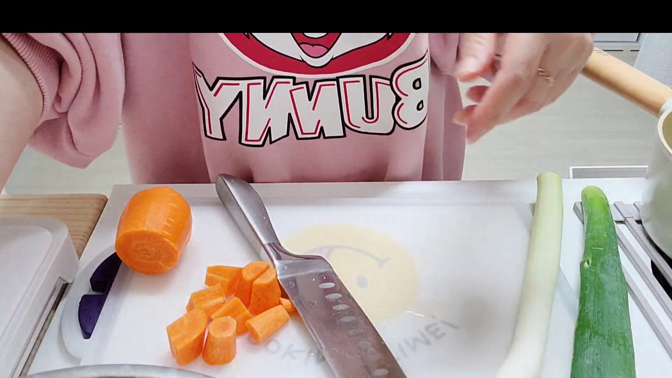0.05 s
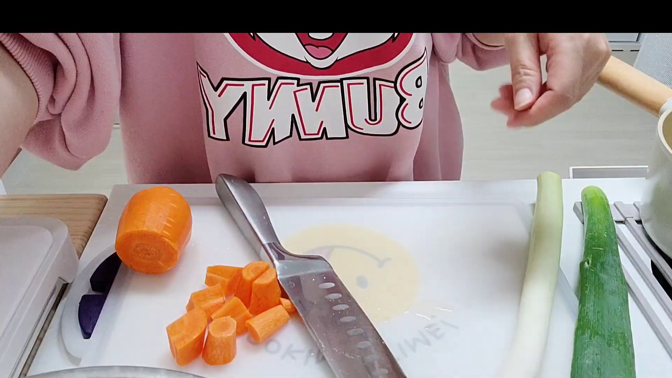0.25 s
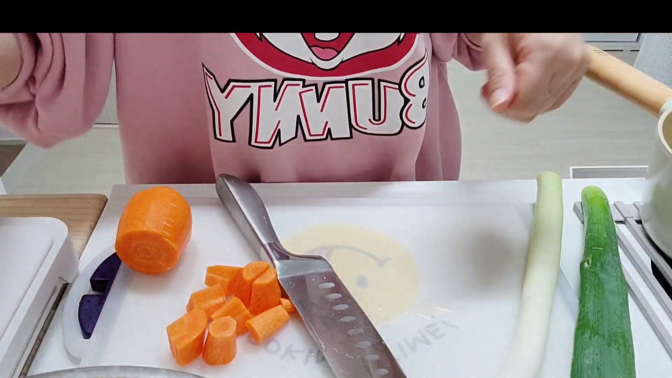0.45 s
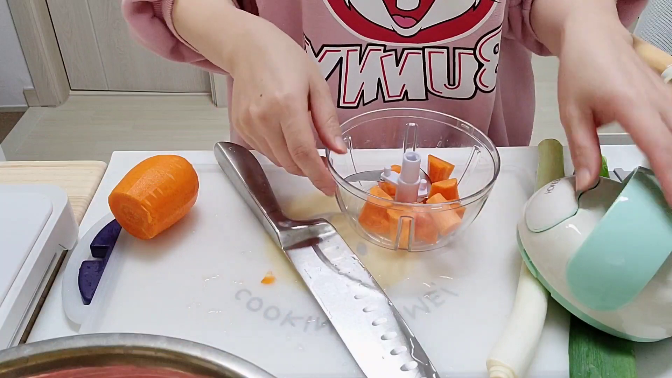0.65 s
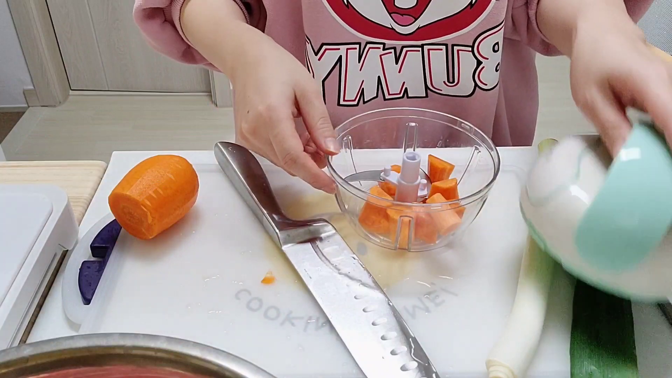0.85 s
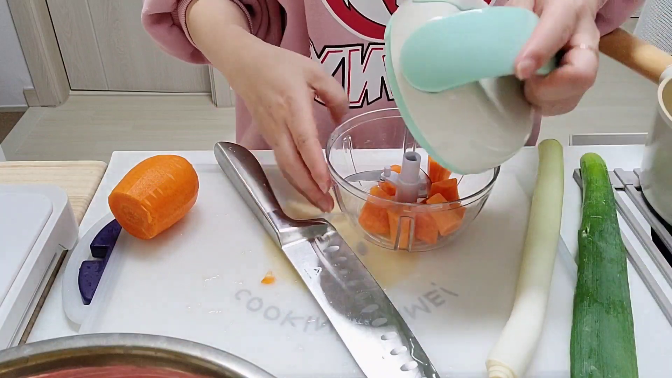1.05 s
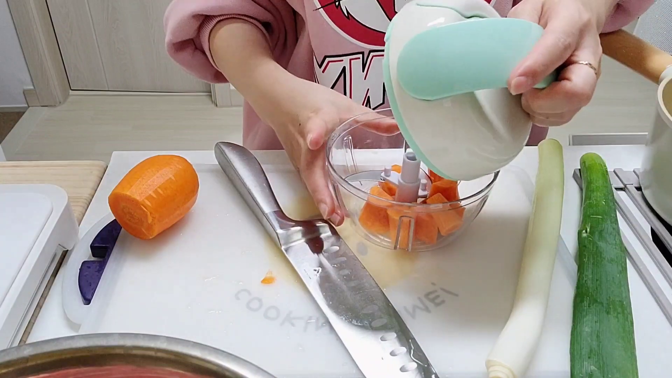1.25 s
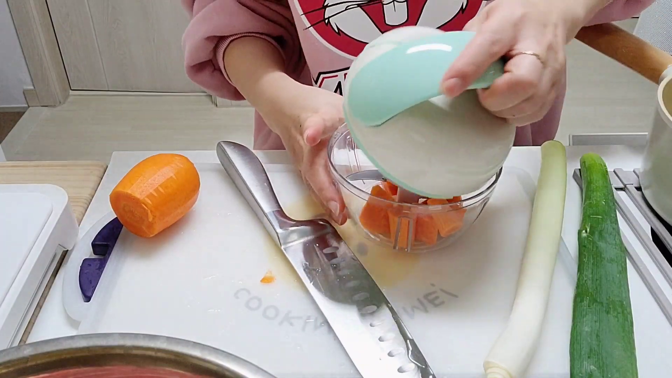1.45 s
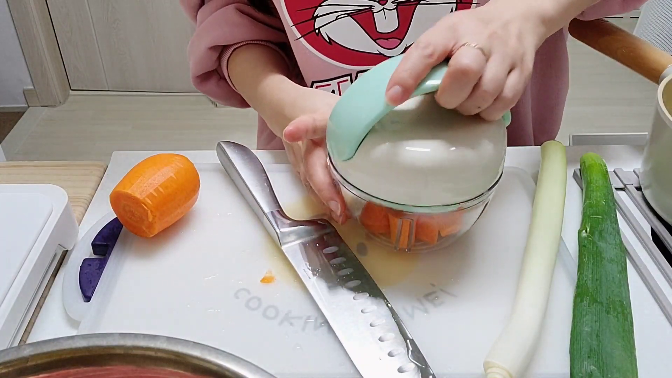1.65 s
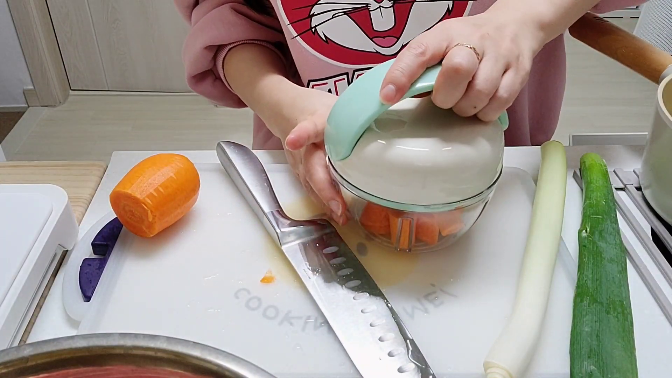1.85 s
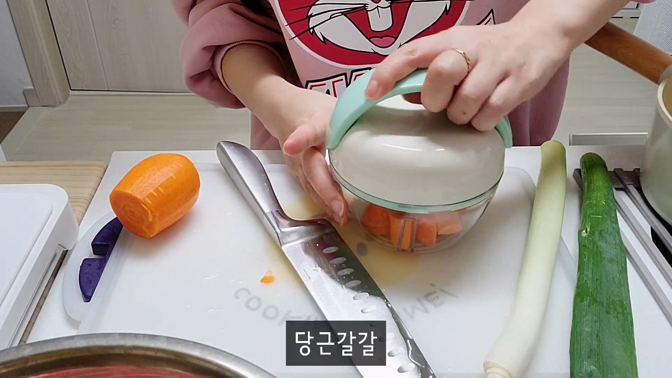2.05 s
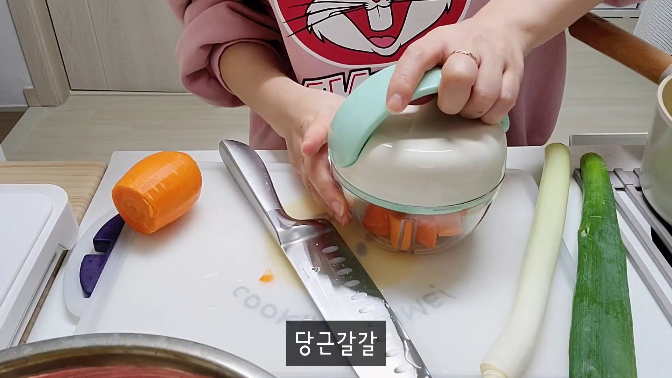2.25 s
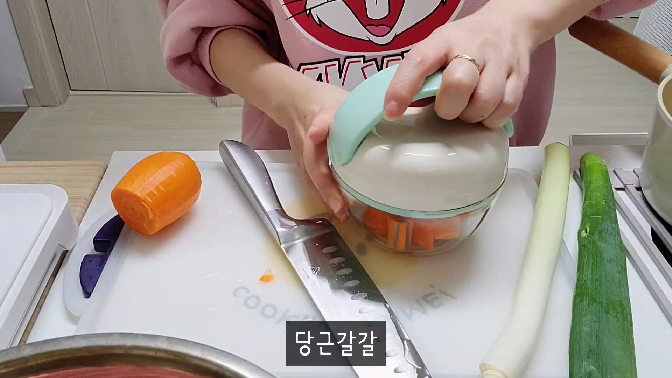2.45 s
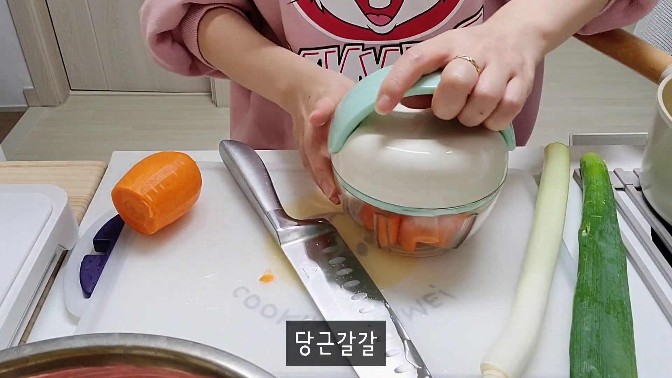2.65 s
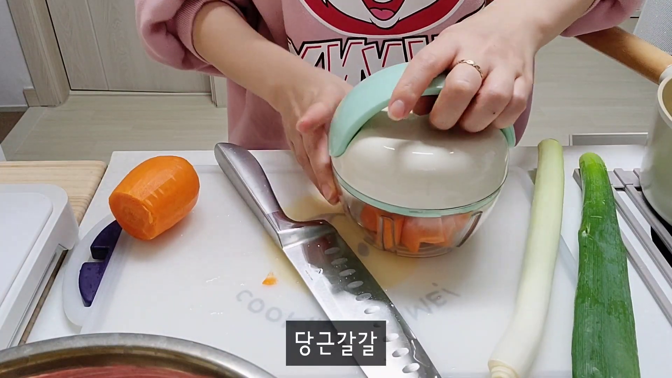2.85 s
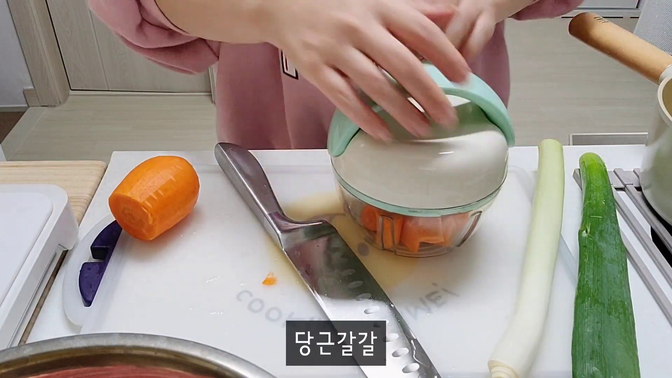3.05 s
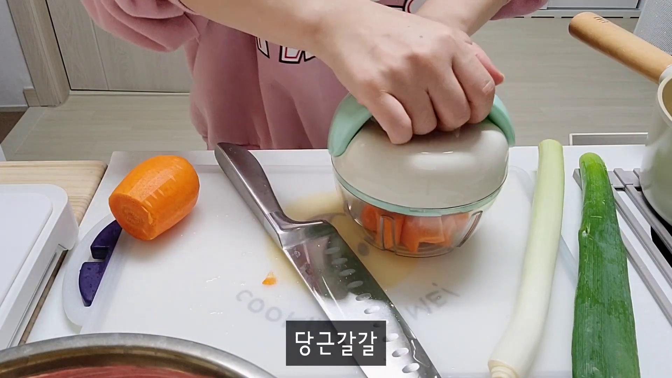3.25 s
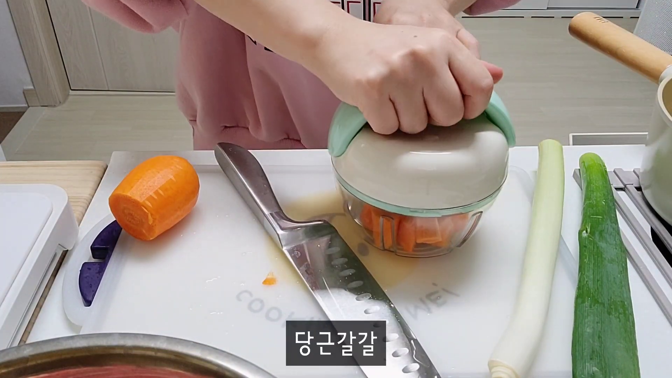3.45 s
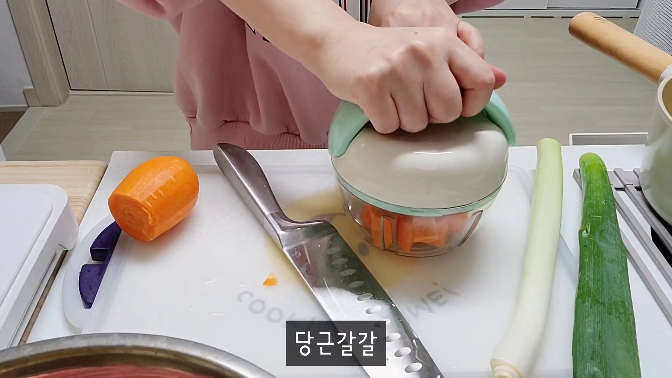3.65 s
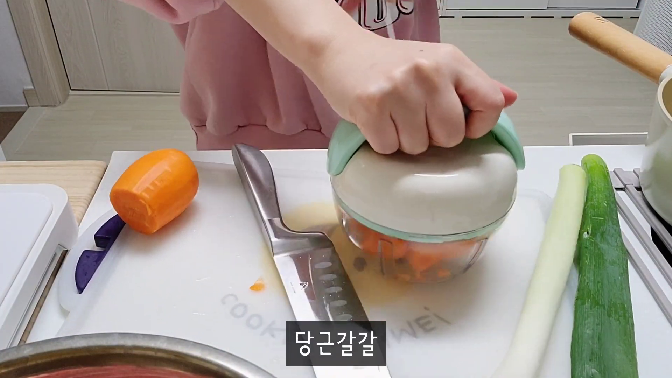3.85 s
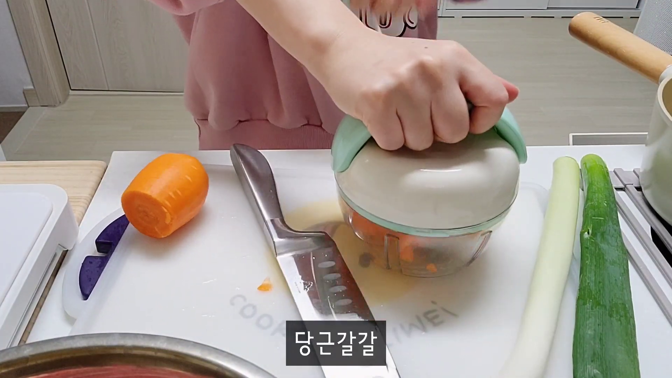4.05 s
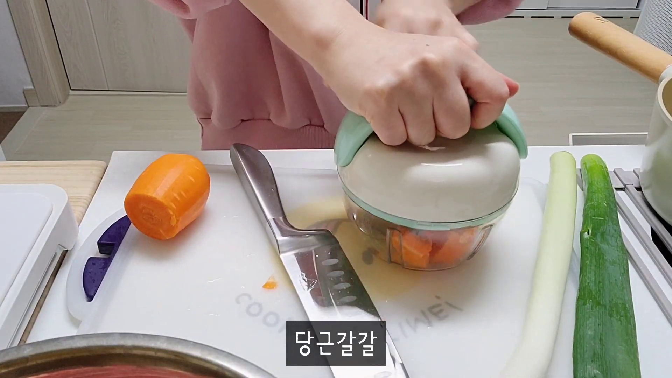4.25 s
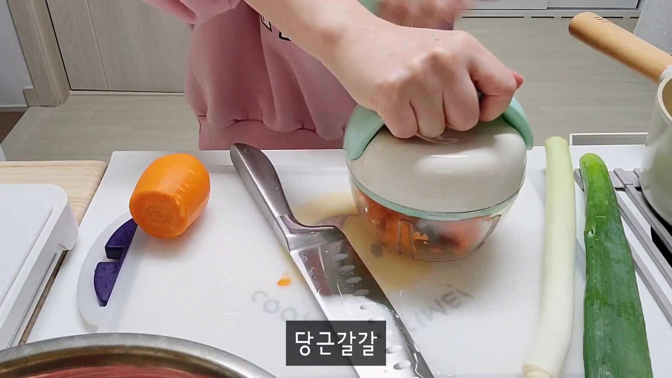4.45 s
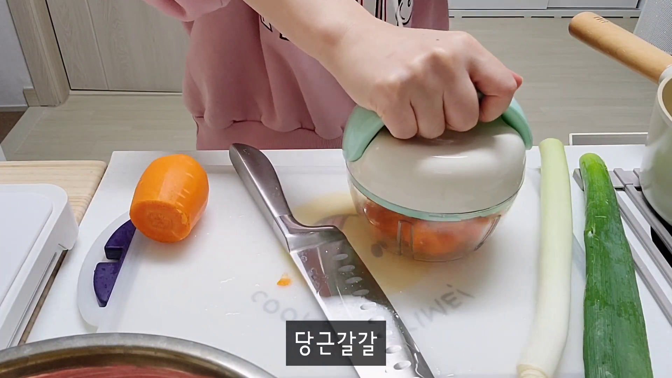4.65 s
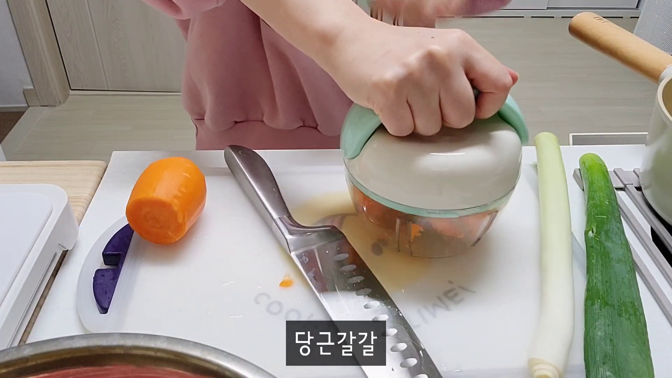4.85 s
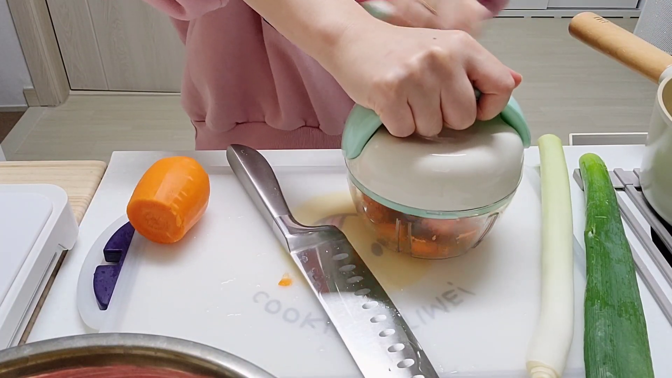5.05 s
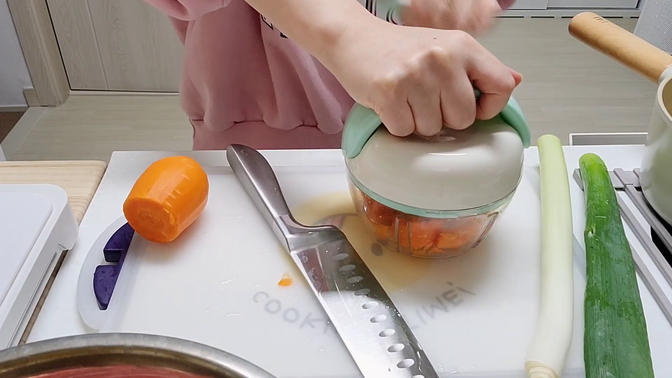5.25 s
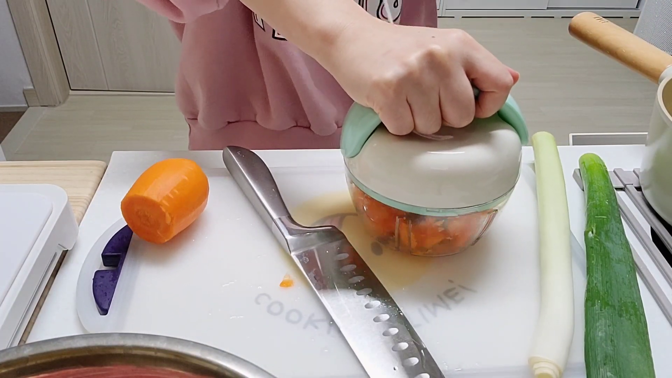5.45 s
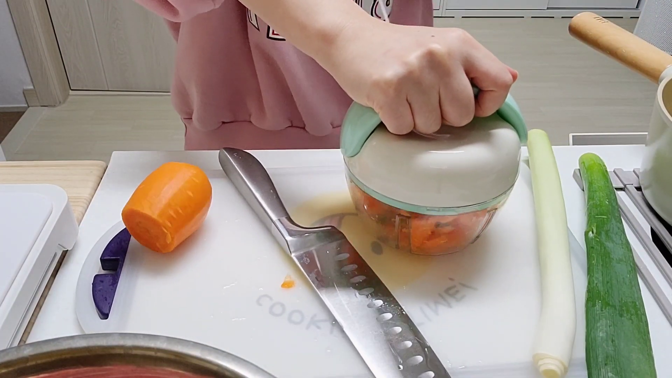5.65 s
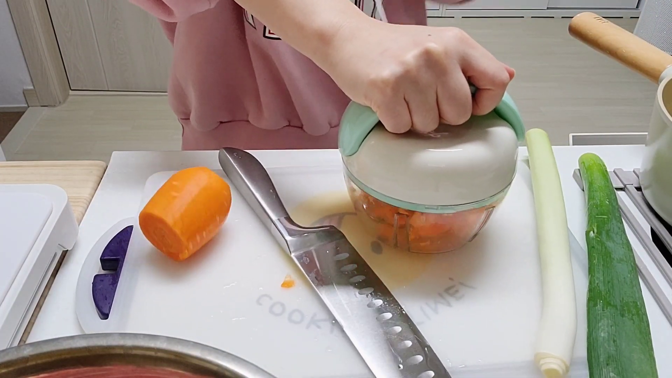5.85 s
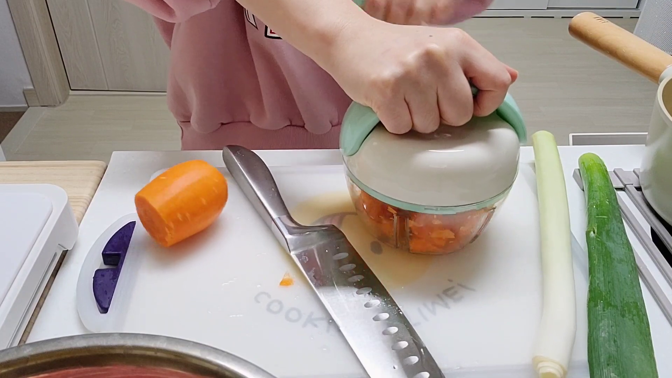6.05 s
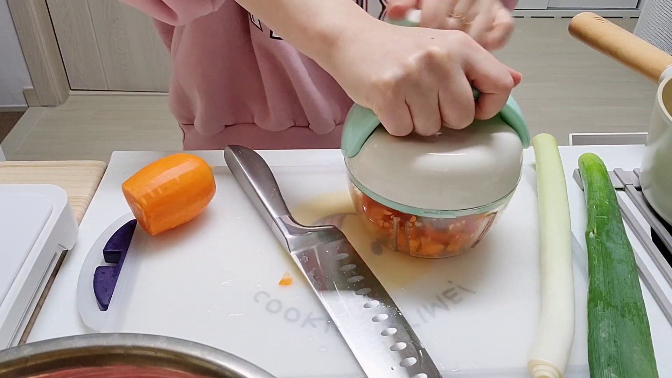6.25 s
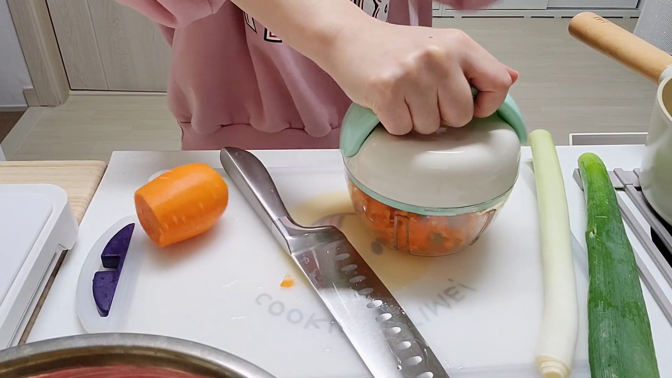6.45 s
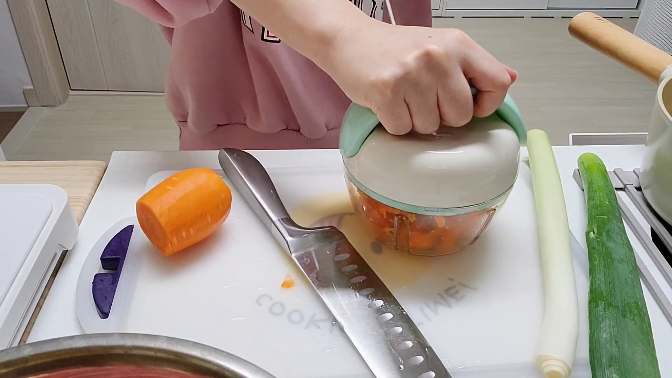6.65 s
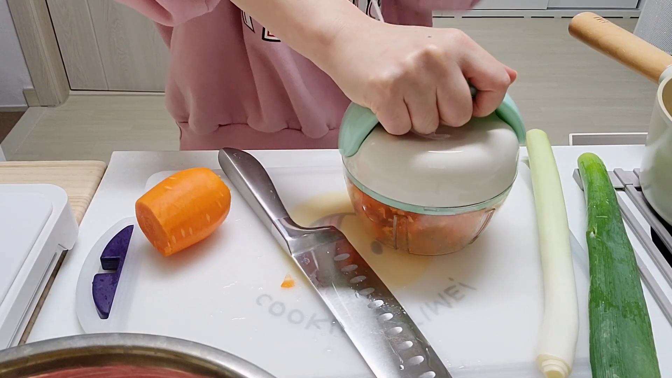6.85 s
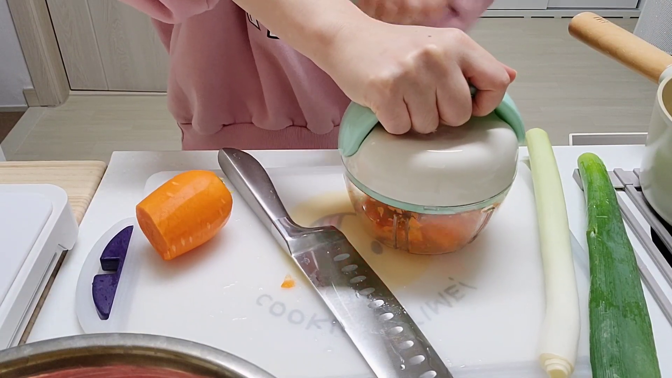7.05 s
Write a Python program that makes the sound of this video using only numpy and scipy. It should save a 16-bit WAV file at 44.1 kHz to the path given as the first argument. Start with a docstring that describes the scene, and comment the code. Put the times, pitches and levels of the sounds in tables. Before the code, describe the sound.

In a quiet kitchen, a plastic lid is set on a small chopper bowl with light knocks, hollow bumps and faint finger rubs. Then the cord is pulled again and again, about four times a second. Each pull whirls the blades through carrot chunks with a hard plastic clatter and crunch, and a lighter spring rattle winds the cord back between pulls. The sound is close, with a short room echo.

```python
"""A cord-pulled food chopper cuts carrots on a plastic board in a quiet kitchen.
First the lid is lifted, set on the bowl and gripped, with knocks, rubs and hollow notes of trapped air.
Then each pull of the cord whirls the blades through the chunks, and a spring rattles the cord back in.
The hits make the plastic bowl, lid and board ring. Behind it are a low drone, a faint hiss,
rustling sleeves and one far tinkle of metal."""
import sys
import numpy as np
from scipy import signal
from scipy.fft import rfft, irfft, next_fast_len
from scipy.io import wavfile
from scipy.ndimage import uniform_filter1d, map_coordinates

SR = 44100
rng = np.random.default_rng(int(sys.argv[2]) if len(sys.argv) > 2 else 0)


def unload_audio(sound):
    """Save the sound as a 16-bit wav file, at the path given as the first command line argument."""
    columns = np.transpose(np.atleast_2d(sound))
    # keep every value between -1 and 1, then stretch to whole-number steps
    steps = np.round(np.clip(columns, -1, 1) * 32767)
    wavfile.write(sys.argv[1], SR, steps.astype(np.int16))


N = 313110
TIME = np.arange(N) / SR

# How long the kitchen echoes. Each row: frequency in Hz, seconds to fade by 60 dB.
ECHO_TIMES = [(150, 0.29), (1500, 0.23), (10000, 0.15)]
# How much left and right differ. Each row: frequency in Hz, level of the difference in dB.
STEREO_WIDTH = [(60, -30), (180, -19.5), (550, -7.5), (1650, -4.5), (4970, -2), (15000, 1.5)]
# Background, in two stretches with a brief gap. Each row: time in seconds, drone in dB, hiss in dB.
AIR_LEVELS = [
    [(0.0, -63, -77), (0.418, -60, -72.5), (0.6, -64.5, -75.5)],
    [(0.63, -70, -83.5), (3.31, -68.5, -81), (3.76, -63.5, -75.5)],
]
# Sleeves, one list for each rustle. Each row: time in seconds, level in dB.
RUSTLES = [
    [(0.0, -55), (0.086, -60.5), (0.18, -89)],
    [(.84, -90), (1.03, -80.5), (1.13, -87)],
    [(2.98, -88), (3.15, -80.5), (3.2, -66)],
]
# Far metal scrapes, then rings. Each row: start in seconds, level in dB.
METAL_SCRAPES = [(0.352, -74), (0.402, -74)]
# Its ringing notes. Each row: start in seconds, pitch in Hz, level in dB, seconds to fade by 60 dB.
METAL_NOTES = [(.365, 2340, -65, 0.13), (.405, 5780, -68, .1), (.41, 5110, -74, 0.46)]
# The tone of four kinds of noise. Each row: frequency in Hz, level in dB.
DRONE_TONE = [(15, -58), (25, -0.5), (214, -4.5), (275, -12.5), (424, -16.5), (617, -21), (910, -21.5),
              (1540, -120)]
HISS_TONE = [(400, -40), (616, -10.5), (789, -29), (1090, -17.5), (1200, -21), (1310, -18), (2970, -27.5),
             (3210, -17), (3870, -26.5), (5270, -36), (16000, -42)]
RUSTLE_TONE = [(180, -46), (300, -17.5), (614, -5.5), (961, -17), (1320, -9), (3400, -17.5), (7820, -23.5),
               (16000, -45)]
CRACK_TONE = [(1470, -1), (2500, -5), (3010, -12), (3440, -16.5), (4080, -3.5), (6500, -16), (16000, -30.5)]
# The notes each part rings at. Each row: pitch in Hz, width in Hz (narrow rings longer), level in dB.
COUNTER_NOTES = [(69, 110, 3.5), (107.6, 9, 2.5), (148, 37, 0), (223, 12, -3.5)]
HANDLE_NOTES = [(1140, 400, 2), (1765, 100, 0), (2190, 250, -6), (2970, 100, -1)]
BOARD_NOTES = [(112, 42, -15), (215.4, 66, 2), (359, 32, 0.5)]
BOWL_NOTES = [(619, 57, 0.5), (926, 99, 4), (1094, 91, 1), (1404, 71, 4.5), (1597, 53, 1.5),
              (1872, 130, -5), (2245, 120, -8)]
LID_NOTES = [(2975, 110, -1.5), (3009, 170, 2.5), (3642, 96, -7), (4160, 91, -13.5), (4290, 300, -19.5),
             (4830, 78, -9.5), (5720, 119, -13)]
PAWL_NOTES = [(3120, 38, 5.5), (3450, 170, 0.5), (4000, 90, 1), (4880, 34, 2.5), (5080, 360, 1),
              (6000, 120, 2), (7720, 1240, 2), (11340, 460, -8.5)]  # the pawl is the small catch that rides over a toothed wheel
# Soft bumps of hands and bowl on the board. Each row: start in seconds, level in dB.
BUMPS = [(1.204, -39), (1.229, -37), (1.398, -48), (1.999, -46.5), (2.135, -35), (2.223, -37),
         (2.303, -42.5), (2.37, -43), (2.551, -47), (2.662, -35), (2.699, -44), (2.796, -47.5),
         (3.183, -48), (3.287, -41.5), (3.329, -52), (3.374, -33), (3.502, -37.5)]
# Air between lid and bowl, lower as the lid closes. Each row: start in seconds, level in dB, pitch in Hz.
HOLLOW_NOTES = [(1.235, -31, 385), (1.399, -44, 860), (1.648, -27, 845), (1.666, -36, 770),
                (1.682, -38, 734), (1.703, -40, 796), (1.72, -38, 870), (1.727, -40, 856),
                (1.746, -37, 755), (1.764, -18.5, 580), (1.851, -35, 510), (2.131, -26, 368),
                (2.139, -25, 357), (2.227, -35, 373)]
# Fingers rub lid and handle. Each row: start in seconds, length in seconds, level in dB.
RUBS = [(1.65, 0.16, -61.5), (2.265, 0.14, -58), (2.649, 0.14, -58.5), (3.266, 0.162, -61),
        (3.483, 0.18, -59.5)]
# Knocks of lid, bowl and hands. Each row: start in seconds, level in dB, brightness in dB.
KNOCKS = [(.639, -57.5, -19), (0.707, -72.5, 7.5), (0.864, -62, -18), (1.201, -40.5, 1), (1.215, -41, -8),
          (1.238, -35.5, -12), (1.397, -54, -3), (1.563, -62, -14), (1.648, -44, -17), (1.679, -56.5, -3),
          (1.72, -45, -17.5), (1.755, -64, 3), (1.764, -30, -12.5), (1.841, -42.5, -10.5), (1.85, -41, -16),
          (2.067, -54, -15), (2.129, -25, -6.5), (2.224, -39.5, -10), (2.294, -45.5, -6.5),
          (2.329, -42, -8.5), (2.468, -71.5, 8), (2.562, -52, -11.5), (2.686, -45.5, -38),
          (2.728, -45.5, -14.5), (3.178, -59.5, -2.5), (3.186, -49.5, -3), (3.298, -68, 8.5),
          (3.326, -54.5, 10), (3.354, -48, -11), (3.374, -39, 1), (3.475, -52.5, -11), (3.508, -42.5, -8.5),
          (3.704, -60, 5.5), (3.712, -49, -9)]
# The spring winds the cord back. Each row: start in seconds, length in seconds, level in dB.
REWINDS = [(3.942, 0.15, -53.5), (4.249, 0.11, -48), (4.511, 0.11, -47), (4.778, 0.12, -51),
           (5.031, 0.12, -48), (5.278, 0.12, -45), (5.529, 0.11, -44), (5.772, 0.11, -44.5),
           (6.036, 0.094, -46), (6.256, 0.13, -45), (6.511, 0.1, -44.5), (6.775, 0.11, -43.5),
           (7.027, 0.12, -45)]
# The pawl snaps over a tooth. Each row: start in seconds, level in dB.
PAWL_SNAPS = [(4.262, -46), (4.814, -51), (5.052, -46), (6.04, -36.5), (6.298, -38), (6.575, -39.5),
              (6.802, -48.5), (6.844, -48)]
# Pulls of the cord. Each row: start, spin-up time and length in seconds, whirl in dB, clutch click in dB.
PULLS = [(3.771, 0.017, 0.16, -28, -35.5), (4.089, 0.021, 0.15, -29.5, -41),
         (4.404, 0.0061, 0.15, -31, -58), (4.636, 0.04, 0.12, -27, -24), (4.896, 0.042, 0.16, -29, -25.5),
         (5.152, 0.017, 0.14, -30, -28.5), (5.392, 0.026, 0.16, -31, -33.5),
         (5.646, 0.035, 0.13, -30.5, -31), (5.879, 0.028, 0.12, -29.5, -31), (6.131, 0.04, 0.14, -30, -31),
         (6.374, 0.023, 0.14, -34, -23.5), (6.626, .008, 0.15, -33.5, -25.5), (6.883, 0.02, 0.14, -30, -24)]
# Hard blade strikes. Each row: start in seconds, level in dB, brightness in dB.
CHOPS = [(3.788, -13, -18), (3.803, -2, -24), (3.835, -11, -20), (3.869, -17, -32), (3.983, -20, -16),
         (4.106, -25, -32), (4.121, -14.5, -10), (4.142, -19, -22), (4.156, -26, -11), (4.175, -6.5, -21),
         (4.284, -19, -14), (4.366, -17, -11), (4.415, -22, -13), (4.422, -8.5, -12), (4.449, -6, -19),
         (4.657, -21, -4), (4.68, -10.5, -9.5), (4.71, -7, -8.5), (4.923, -7, -22.5), (4.942, -14, -12.5),
         (4.981, -18, -25), (4.984, -23, -3.5), (5.168, -20, 1), (5.195, -12, -20), (5.266, -30, -20),
         (5.426, -24, -8), (5.447, -9, -12.5), (5.483, -11, -44), (5.52, -13.5, -44), (5.675, -32, -19),
         (5.69, -22, -16), (5.714, -29, -10), (5.909, -22, 0.5), (5.92, -5, -16), (5.934, -12, -25),
         (6.182, -25.5, 1), (6.195, -7, -25.5), (6.225, -12, -26), (6.41, -24, -15), (6.438, -14.5, -15.5),
         (6.467, -13.5, -23), (6.663, -14.5, -21), (6.673, -12, -14), (6.684, -10.5, -10),
         (6.914, -30, -20), (6.928, -14.5, -8.5), (6.963, -11, -12.5), (7.009, -16, -28)]


def amp(db):
    """Turn decibels into a number to multiply by."""
    return 10 ** (np.asarray(db) / 20)


def unit(x):
    """Scale a signal to an average power of 1."""
    return x / np.sqrt(np.mean(x ** 2) + 1e-20)


def along(points, hz):
    """Read between the rows of a frequency table, on a log scale."""
    freqs, values = np.transpose(points)
    return np.interp(np.log(hz + 1), np.log(freqs + 1), values)


def curves(stretches):
    """Join timed rows into one curve per column; the first curve is silent between stretches."""
    silence = lambda row, step: (row[0] + step, -120, *row[2:])
    rows = [row for part in stretches for row in (silence(part[0], -.004), *part, silence(part[-1], .004))]
    times, *columns = np.transpose(sorted(rows))
    return [np.interp(TIME, times, column) for column in columns]


def strokes(start, rise, length, db, fall_s, sag_db, edge_db, crest_db):
    """Level in dB of sagging strokes; edge_db shifts their two ends and crest_db their middle."""
    shapes = [[(s, level + edge_db), (s + up, level),
               (s + (up + span - fall_s) / 2, level + sag_db / 2 + crest_db),
               (s + span - fall_s, level + sag_db), (s + span, level + sag_db + edge_db)]
              for s, up, span, level in np.broadcast(start, rise, length, db)]
    return curves(shapes)[0]


def bursts(times, levels_db, decay_s, rise_s):
    """Short pushes that rise fast and die away."""
    out = np.zeros(N + SR)
    t = np.arange(int(decay_s * 7 * SR)) / SR
    for start, db in np.broadcast(times, levels_db):
        out[round(start * SR):][:len(t)] += amp(db) * np.exp(-t / decay_s) * (1 - np.exp(-t / rise_s))
    return out[:N]


def taps(per_second, spread_db, bed_db):
    """Random taps of uneven size on top of a steady push."""
    hit = rng.random(N) < per_second / SR
    size = hit * amp(spread_db * np.minimum(rng.exponential(size=N), 2))
    return unit(unit(size) + amp(bed_db))


def wander(per_second):
    """A curve that slides from one random value to the next."""
    return np.interp(TIME * per_second, np.arange(600), rng.standard_normal(600))


def filtered(x, response):
    """Turn each frequency up or down by response(hz)."""
    size = next_fast_len(N + 8192)
    return irfft(rfft(x, size) * response(np.fft.rfftfreq(size, 1 / SR)), size)[..., :N]


def noise(tone, force=1):
    """Noise with the given tone, loud where the force is strong."""
    colour = lambda x: filtered(x, lambda hz: amp(along(tone, hz)))
    white = rng.standard_normal((2, N))
    return colour(force * white) / np.std(colour(white))


def ring(force, notes, wander_db=0, detune=0):
    """Each tap rings each note at a random strength; notes swell and fade as the contact point roams."""
    out, power = np.zeros((2, N)), 0
    for hz, width, db in notes:
        for shift in (-detune, detune):  # each note is a close pair
            decay = np.exp(-np.pi * max(width, 10) / SR)
            angle = 2 * np.pi * hz * (1 + shift) / SR
            share = rng.standard_normal(out.shape) * unit(amp(wander_db * wander(per_second=14)))
            note = signal.lfilter([np.sin(angle)], [1, -2 * decay * np.cos(angle), decay ** 2], force * share)
            out += amp(db) * np.sqrt(width) * note
            power += amp(db) ** 2 * width / (1 - decay ** 2) / 2
    return out / np.sqrt(power)


def widen(pair, lag_share=0.35):
    """Make left and right from a middle and a side signal; they differ most in the treble."""
    middle, side = pair
    gain = lambda hz: amp(along(STEREO_WIDTH, hz))
    shifted = filtered(middle, lambda hz: 1j * gain(hz))  # moved by a quarter of a wave
    side = np.sqrt(1 - lag_share ** 2) * filtered(side, gain) + lag_share * shifted
    return np.array([middle + side, middle - side])


def kitchen_echo(x):
    """The room answers with a short echo whose high notes die first."""
    hz, t, spectrum = signal.stft(rng.standard_normal((2, SR // 2)), SR, nperseg=256)
    fade = amp(-60 * t / along(ECHO_TIMES, hz)[:, None])
    tail = signal.istft(spectrum * fade, SR, nperseg=256)[1]
    return signal.fftconvolve(x, tail / np.linalg.norm(tail[0]), axes=1)[:, :N]


def background():
    """A wavering drone and a hiss, both louder during the chopping, plus sleeves and a far tinkle."""
    while_chopping = [(seconds, -55, -62) for seconds in (3.77, 7.2)]
    drone_db, hiss_db = curves([*AIR_LEVELS, while_chopping])
    sounding = drone_db > -110  # off in the brief gaps
    waver_db = 2 * map_coordinates(rng.standard_normal(90), [TIME * 12])
    out = amp(drone_db + waver_db) * noise(DRONE_TONE) + sounding * amp(hiss_db) * noise(HISS_TONE)
    out += amp(curves(RUSTLES)[0]) * noise(RUSTLE_TONE)
    out += ring(bursts(*np.transpose(METAL_SCRAPES), decay_s=0.023, rise_s=0.01), [(7950, 500, 0)])
    for start, hz, db, fade_s in METAL_NOTES:
        t = np.maximum(TIME - start, 0)
        level = amp(db - 60 * t / fade_s + 2.5 * wander(71.3)) * (1 - np.exp(-t / 0.0049))
        out += sounding * level * np.sin(2 * np.pi * hz * t)
    return out


def counter_bumps():
    """Soft pushes make the counter under the board thud."""
    return ring(bursts(*np.transpose(BUMPS), decay_s=0.012, rise_s=0.0028), COUNTER_NOTES)


def trapped_air(rise_s=0.0014, decay_s=0.0045):
    """The scraping lid sounds the air in the bowl: short, soft notes with a slight wobble."""
    out, t = np.zeros((2, N)), TIME[:SR // 10]
    for start, db, hz in HOLLOW_NOTES:
        level = bursts(0, db, decay_s, rise_s)[:len(t)] * (1 - np.exp(-t / rise_s))
        note = level * np.sin(2 * np.pi * hz * t + wander(240)[:len(t)])
        side_share = 0.49 * rng.standard_normal()
        out[:, round(start * SR):][:, :len(t)] += note * [[1], [side_share]]
    return out


def finger_rubs(edge_s=0.019):
    """Fingers scrape over the plastic, easing off as they go."""
    start, length, db = np.transpose(RUBS)
    level_db = strokes(start, edge_s, length, db, edge_s, sag_db=-5, edge_db=-26, crest_db=-3)
    rub = amp(level_db) * taps(per_second=250, spread_db=2, bed_db=-1)
    return ring(rub, HANDLE_NOTES, wander_db=8, detune=0.02) + amp(-17.5) * noise(CRACK_TONE, rub)


def plastic(forces):
    """Three forces ring the bowl, lid and board; a fourth crunches without ringing."""
    bowl, lid, board, snap = forces
    crunch = np.sqrt(np.abs(uniform_filter1d(snap ** 2, size=90)))
    return (ring(bowl, BOWL_NOTES, wander_db=2, detune=0.018)
            + ring(lid, LID_NOTES, wander_db=3, detune=0.018)
            + ring(board, BOARD_NOTES, wander_db=2.5, detune=0.036)
            + noise(CRACK_TONE, crunch))


def hand_knocks():
    """Forces on the plastic: each knock is a cluster of tiny taps, and bright ones crunch more."""
    start, db, bright_db = np.transpose(KNOCKS)
    grain = taps(per_second=2800, spread_db=0, bed_db=-5)
    knock = grain * bursts(start, db, decay_s=0.0052, rise_s=0.0017)
    sharp = grain * bursts(start, db + bright_db, decay_s=0.0052, rise_s=0.0013)
    snap = grain * bursts(start, db + 1.67 * bright_db, decay_s=0.0052, rise_s=0.0019)
    return np.array([knock, sharp, amp(-0.5) * knock, amp(-1.5) * snap])


def chunk_size(big_until_s=3.946, shrink_s=0.49):
    """1 while the carrot is in big chunks, falling toward 0 as it is minced."""
    return np.exp(-np.maximum(TIME - big_until_s, 0) / shrink_s)


def rewind_db(edge_db, crest_db, rise_s=0.022, fall_s=0.018, sag_db=-7):
    """How loud the cord is as it reels in."""
    start, length, db = np.transpose(REWINDS)
    return strokes(start, rise_s, length, db, fall_s, sag_db, edge_db, crest_db)


def tumbling_chunks():
    """Forces of chunks that drop on bowl and board as the cord reels in; small pieces are quieter."""
    level_db = rewind_db(edge_db=-4, crest_db=1) + 17.5 * chunk_size() - 2.5
    tumble = amp(level_db) * taps(per_second=120, spread_db=5, bed_db=-6)
    return np.array([tumble, np.zeros(N), amp(-9.5) * tumble, np.zeros(N)])


def spring_rattle():
    """The pawl chatters as the spring reels the cord in, catching harder now and then."""
    level_db = rewind_db(edge_db=-20, crest_db=5) + 1.8 * wander(60)
    chatter = amp(level_db) * taps(per_second=700, spread_db=2.5, bed_db=-3)
    chatter += bursts(*np.transpose(PAWL_SNAPS), decay_s=0.0053, rise_s=0.0026)
    return ring(chatter, PAWL_NOTES, wander_db=5, detune=0.024) + amp(-4) * noise(CRACK_TONE, chatter)


def blades():
    """Forces of each pull: the clutch clicks, then the blades cut chunks and fling them at the bowl."""
    start, spin_up, length, whirl_db, click_db = np.transpose(PULLS)
    pull = lambda **shape: strokes(start, spin_up, length, whirl_db, fall_s=0.032, sag_db=-3.5, **shape)
    whirl = amp(pull(edge_db=-17, crest_db=6)) * taps(per_second=200, spread_db=2, bed_db=-4)
    # The blade tips ping the plastic only at speed, and less among big chunks.
    tips_db = pull(edge_db=-40, crest_db=8) - 12 - 4 * chunk_size()
    pings = amp(tips_db) * taps(per_second=350, spread_db=4, bed_db=-2)
    chop_start, chop_db, bright_db = np.transpose(CHOPS)
    strike = bursts(chop_start, chop_db, decay_s=0.0015, rise_s=0.0026)
    strike += bursts(start, click_db + 1.5, decay_s=0.0021, rise_s=0.0049)
    sharp = bursts(chop_start, chop_db + bright_db, decay_s=0.0029, rise_s=0.0031)
    sharp += bursts(start, click_db, decay_s=0.0041, rise_s=0.0049)
    bowl = whirl + strike
    return np.array([bowl, pings + sharp, amp(-8) * bowl, amp(-5.5) * pings + amp(0.5) * sharp])


def scene():
    """The chopper, its echo and the background, in stereo."""
    body = plastic(blades() + tumbling_chunks() + hand_knocks())
    chopper = widen(body + spring_rattle() + finger_rubs() + trapped_air() + counter_bumps())
    return chopper + amp(-14.5) * kitchen_echo(chopper) + widen(background())


def record(dry, bass_hz=80, top_hz=15850):
    """The microphone loses the deepest bass, and nothing above top_hz is kept."""
    return filtered(dry, lambda hz: (hz < top_hz) * 1j * hz / (bass_hz + 1j * hz))


dry = scene()
out = record(dry)
unload_audio(out)
```